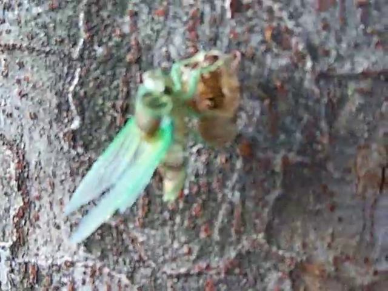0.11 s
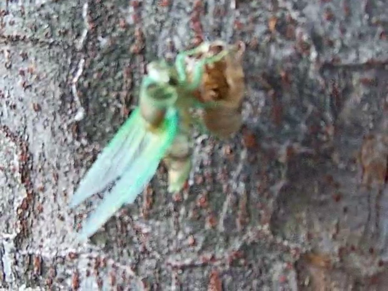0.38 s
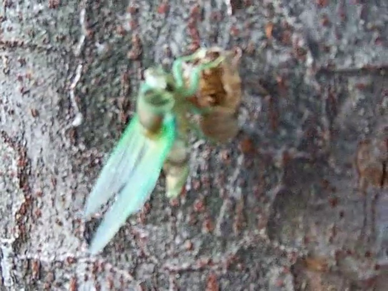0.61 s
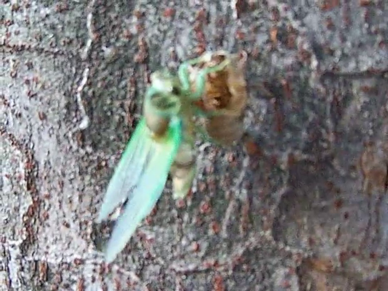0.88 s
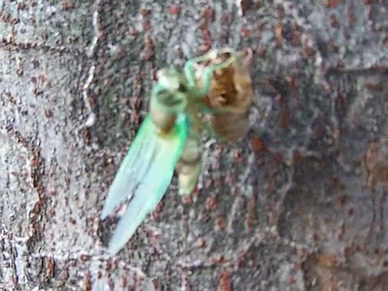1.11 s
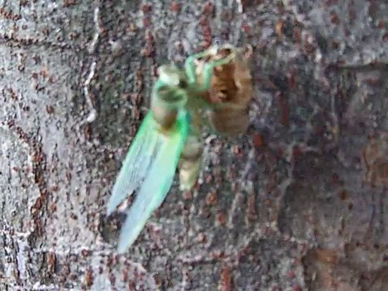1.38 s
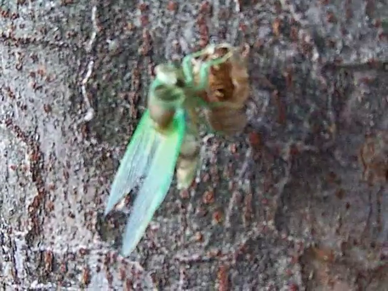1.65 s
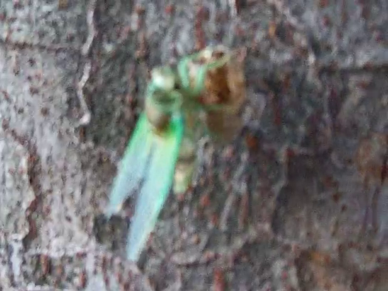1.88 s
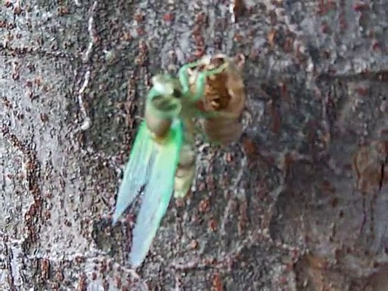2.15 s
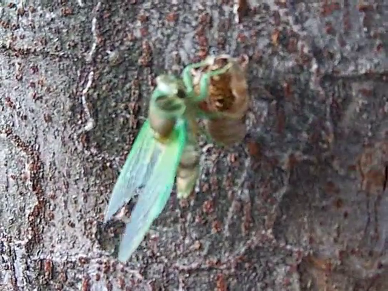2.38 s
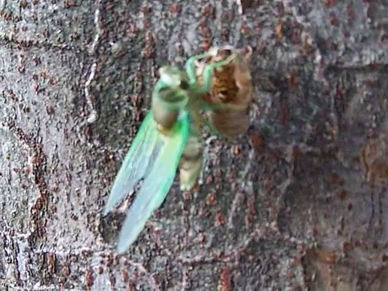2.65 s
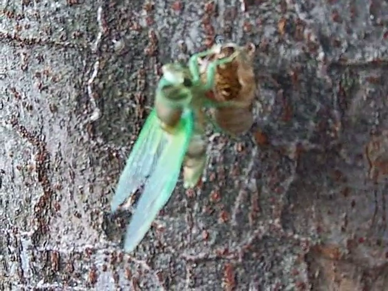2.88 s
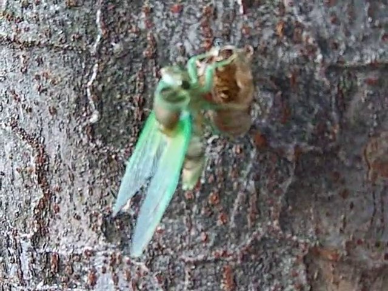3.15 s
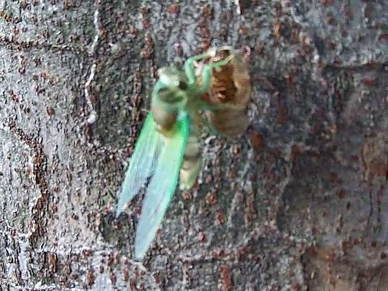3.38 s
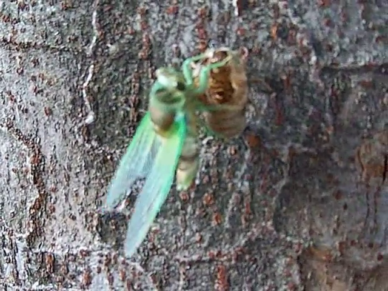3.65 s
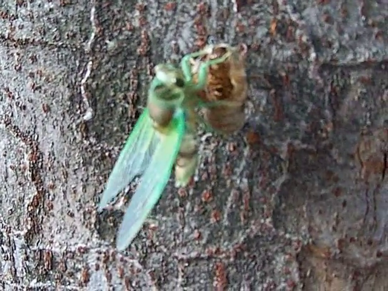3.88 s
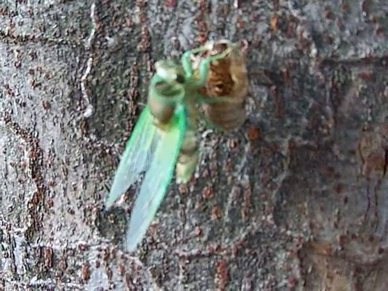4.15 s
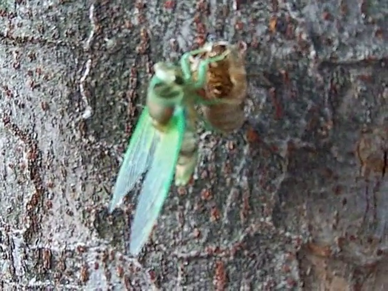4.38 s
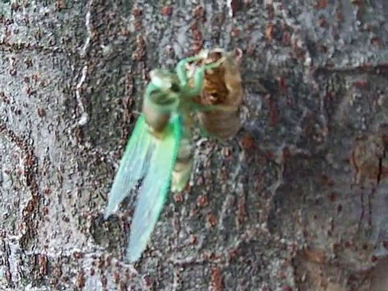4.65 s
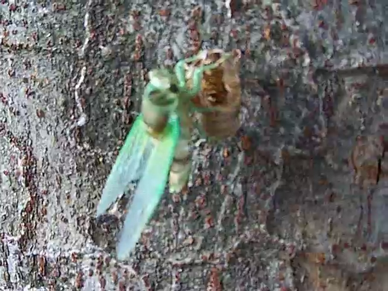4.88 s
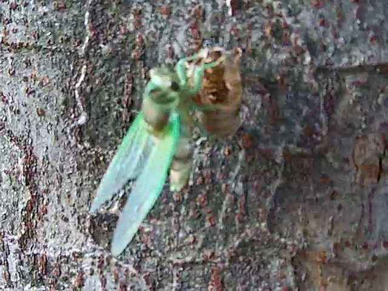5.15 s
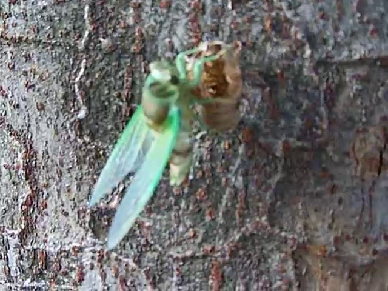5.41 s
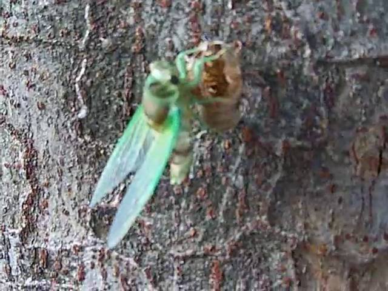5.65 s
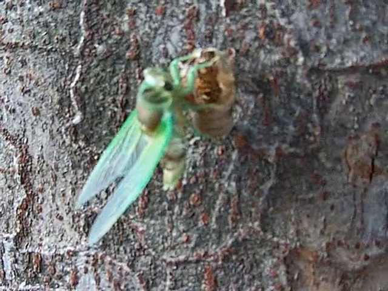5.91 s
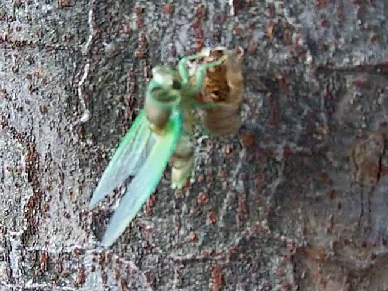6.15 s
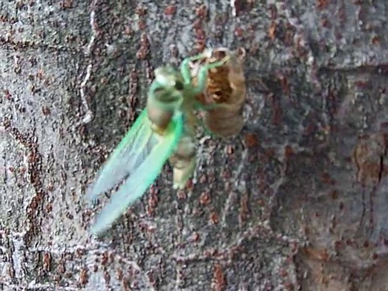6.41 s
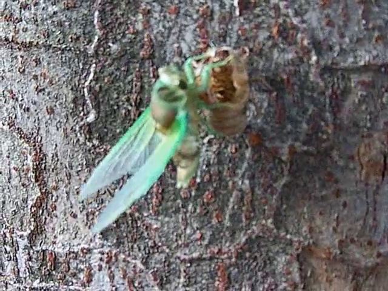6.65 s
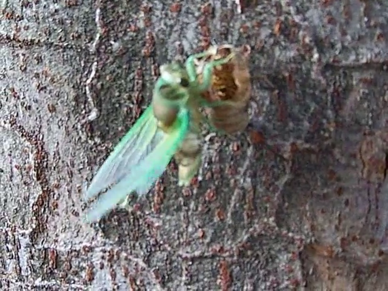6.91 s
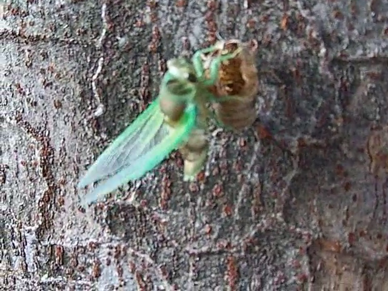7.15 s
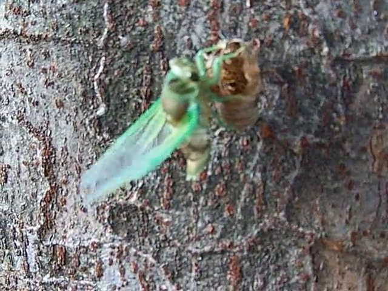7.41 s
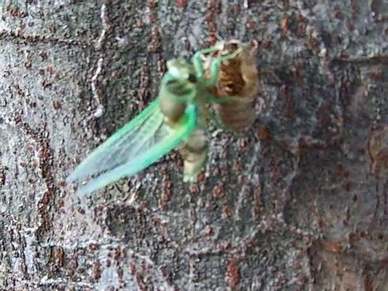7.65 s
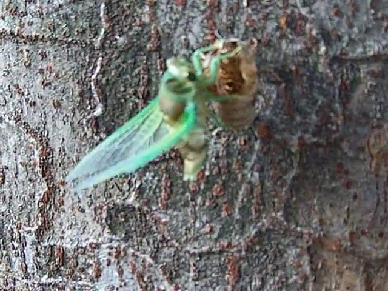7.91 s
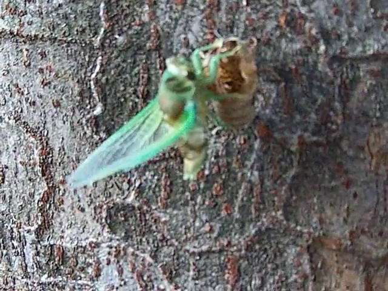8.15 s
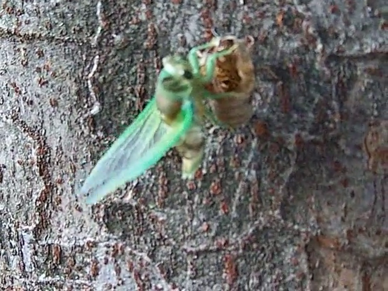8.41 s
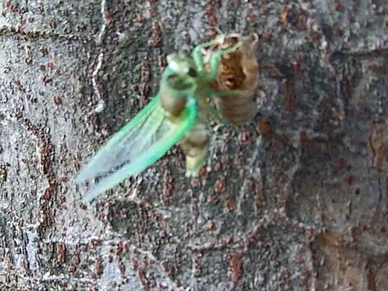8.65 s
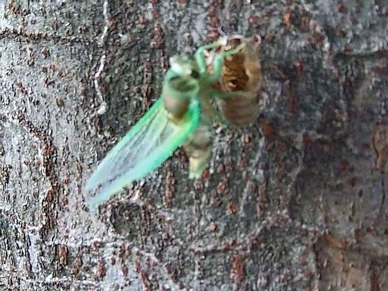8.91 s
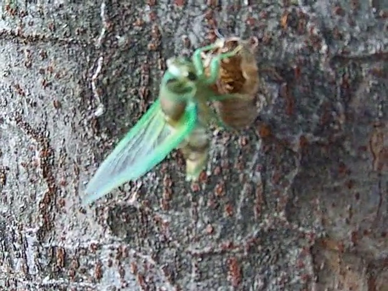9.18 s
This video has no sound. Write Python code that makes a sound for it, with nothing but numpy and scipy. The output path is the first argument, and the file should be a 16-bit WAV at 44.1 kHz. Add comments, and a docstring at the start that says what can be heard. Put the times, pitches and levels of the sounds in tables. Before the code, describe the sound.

A cicada close by buzzes in fast throbs, about six a second, over a steady cicada whine, a far insect chorus and low distant traffic.

```python
"""Cicadas buzz in trees: a near one throbs about six times a second, its clicks speeding up in each throb.
A steady singer and a far chorus fill in. The two singers are clicks that ring a small body; the chorus is noise.
Distant traffic roars and drones under them, made of coloured noise and wavering tones.
A small mono recorder samples at 16 kHz and drops a few samples between its blocks,
which leaves a faint regular ticking."""
import sys
import numpy as np
from scipy import signal
from scipy.io import wavfile
from scipy.ndimage import uniform_filter1d

SR = 44100
rng = np.random.default_rng(int(sys.argv[2]) if len(sys.argv) > 2 else 0)


def waveform_to_disk(signal):
    """Save audio, clipped to [-1, 1], as 16-bit WAV at the path in sys.argv[1]."""
    frames = np.transpose(np.atleast_2d(signal))
    scaled = np.clip(frames, -1, 1) * 32767
    samples = np.round(scaled).astype(np.int16)
    wavfile.write(sys.argv[1], SR, samples)


def decibels_to_gain(level_db):
    """Convert a level in decibels to a linear amplitude gain (20 dB per decade)."""
    exponent = np.asarray(level_db, float) / 20
    return 10 ** exponent


N = 409688


def evened(x):
    """Scales a sound to rms 1."""
    return x / np.sqrt(np.mean(x ** 2) + 1e-20)


def curve(rows):
    """Joins the rows of a table by straight lines: one value a sample for each column after the time."""
    time_s, *columns = np.transpose(rows)
    return [np.interp(np.arange(N) / SR, time_s, column) for column in columns]


def wander(per_s):
    """Slow random drift of rms 1: noise averaged twice over 1 / per_s seconds."""
    size = max(round(SR / per_s), 1)
    smooth = uniform_filter1d(rng.standard_normal(N), size)
    return evened(uniform_filter1d(smooth, size))


def hiss(spectrum, patchy_db):
    """Noise of a given colour, rms 1, with drifting louder and softer patches."""
    frames, hz = N // 256 + 5, np.fft.rfftfreq(1024, 1 / SR)
    real, imaginary, patches = rng.standard_normal((frames, 513, 3)).T
    # neighbouring pitches and moments share a patch
    patches = evened(uniform_filter1d(uniform_filter1d(patches, 12, 0), 14, 1))
    table_hz, table_db = np.transpose(spectrum)
    colour_db = np.interp(np.log(hz + 1), np.log(table_hz + 1), table_db)[:, None]
    cells = (real + 1j * imaginary) * decibels_to_gain(colour_db + patchy_db * patches)
    return evened(signal.istft(cells, nperseg=1024, noverlap=768)[1][:N])


def buckles(clicks_per_s, drift):
    """Places in samples at which the tymbals buckle: wherever the running count of clicks is whole."""
    count = np.cumsum(clicks_per_s * (1 + drift * wander(4))) / SR
    return np.interp(np.arange(1, int(count[-1])), count, np.arange(N))


def pulses(at, size):
    """Band-limited clicks, placed exactly even between two samples."""
    where = np.floor(at)[:, None] + np.arange(-8, 9)
    offset = where - at[:, None]
    shape = np.sinc(offset) * np.cos(np.pi * offset / 20) ** 2
    places = np.clip(where, 0, N - 1).astype(int)
    return np.bincount(places.ravel(), (size[:, None] * shape).ravel(), N)


def body(modes):
    """Ring of the body after a click: the powers of its modes add; so small a body sends out little low sound."""
    lowest_hz = 4840  # below this the ring fades steeply
    f = abs(np.fft.fftfreq(4096, 1 / SR))
    power = 0
    for hz, width, db in modes:
        peak = 1 / (1 + (2 * (f - hz) / width) ** 2)
        skirt = 1 / (1 + ((f - hz) / (1.56 * width)) ** 2)
        power = power + decibels_to_gain(2 * db) * peak * skirt
    low_cut = 1 + (lowest_hz / (f + 1)) ** 12
    log_gain = .5 * np.log(power / low_cut + 1e-12)
    # this phase makes the ring start at the click and never before it
    return np.fft.ifft(np.exp(np.conj(signal.hilbert(log_gain)))).real[:2048]


def cicada(level_db, modes, at, shake_s, uneven_db, weak_side_db, far_side_s, rib_db):
    """Two tymbals buckle in turn; each click rings the abdomen, and the trees throw it back."""
    # echoes off trunks and ground: (delay [s], level [dB])
    echoes = [(.0093, -15), (.016, -15), (.027, -17)]
    rib_gap_s, rib_shake_s = .00177, .00003  # the second rib: delay and its scatter
    shake, uneven, rib_shake = rng.standard_normal((len(at), 3)).T
    side = np.arange(len(at)) % 2
    # each click lands a little early or late, which blurs the lines of the buzz; the far side arrives later
    first = at + SR * (shake_s * shake + far_side_s * side)
    size = decibels_to_gain(uneven_db * uneven + weak_side_db * side)
    # a second rib of the tymbal gives way just after the first
    second = first + SR * (rib_gap_s + rib_shake_s * rib_shake)
    clicks = pulses(first, size) + pulses(second, size * decibels_to_gain(rib_db))
    ringing = evened(signal.oaconvolve(clicks, body(modes))[:N])
    direct = decibels_to_gain(level_db) * ringing
    thrown_back = sum(decibels_to_gain(db) * np.pad(direct, (round(s * SR), 0))[:N] for s, db in echoes)
    return direct + thrown_back


def throbbing():
    """Click rate and the levels of both rings: slow effort, one shape every throb, a little chance."""
    # one row every fourth throb: (time of the gap [s], low ring level [dB], high ring level [dB])
    throbs = [(-0.06, -27, -25), (0.627, -26.5, -28), (1.315, -28, -24.5), (2.011, -25.5, -24.5),
              (2.69, -25, -29), (3.381, -25.5, -26), (4.071, -25, -28), (4.762, -25.5, -26.5),
              (5.457, -25, -26.5), (6.158, -24.5, -28.5), (6.864, -25.5, -28), (7.58, -25, -29.5),
              (8.302, -27, -26), (9.045, -25.5, -30), (9.8, -24.5, -29.5)]
    # added within each throb: (share of its length [0-1], low ring [dB], high ring [dB])
    throb_shape = [(0, -12, -6), (.05, -7, -5), (.14, 0, -3.5), (.23, .5, -3), (.31, -2, -3),
                   (.6, -1.5, -1.5), (.72, .5, .5), (.8, .5, .5), (.87, -4, -1.5), (.95, -10, -5),
                   (1, -12, -6)]
    # the clicks speed up through most of each throb: (share of its length [0-1], rate [clicks per s])
    click_rate = [(0, 226), (.1, 238), (.2, 263), (.3, 278), (.5, 294), (.7, 330), (.8, 350), (.97, 360),
                  (1, 226)]
    gap_s = np.transpose(throbs)[0]
    throbs_done = np.interp(np.arange(N) / SR, gap_s, 4 * np.arange(len(gap_s)))  # 4 throbs a row
    share = throbs_done % 1
    low_effort_db, high_effort_db = curve(throbs)
    at, low_shape, high_shape = np.transpose(throb_shape)
    # no two throbs are alike
    low_db = low_effort_db + np.interp(share, at, low_shape) + 0.47 * wander(26)
    high_db = high_effort_db + np.interp(share, at, high_shape) + 1.5 * wander(26)
    return np.interp(share, *np.transpose(click_rate)), low_db, high_db


def near_cicada():
    """The throbbing singer: the same buckling tymbals give a low ring and a slightly later high ring."""
    # both tables: (pitch [Hz], width [Hz], level [dB])
    low_modes = [(5540, 200, -7.5), (5940, 170, -8), (6000, 170, 0.5), (6154, 140, 1.5), (6310, 200, -2),
                 (6860, 150, -8), (6950, 320, -3.5), (8025, 530, -0.5)]
    high_modes = [(6840, 280, -15), (7700, 260, -15.5), (7510, 400, -8.5), (7900, 270, -7.5),
                  (8240, 200, -1)]
    high_late_s = .0009  # the high ring lags each click
    clicks_per_s, low_db, high_db = throbbing()
    at = buckles(clicks_per_s, drift=.012)
    low = cicada(low_db, low_modes, at, shake_s=.000008, uneven_db=.7,
                 weak_side_db=-3.5, far_side_s=.0006, rib_db=-11)
    high = cicada(high_db, high_modes, at + SR * high_late_s, shake_s=.000012, uneven_db=.7,
                  weak_side_db=-2, far_side_s=.0001, rib_db=-3)
    return low + high


def steady_cicada():
    """A singer a few trees off buckles its tymbals at a nearly even rate, so it does not throb."""
    # ring of its body: (pitch [Hz], width [Hz], level [dB])
    steady_modes = [(5900, 180, -8.5), (5640, 730, -12), (6000, 430, -5.5), (6638, 110, 3),
                    (7380, 173, 2.5)]
    # its loudness: (time [s], level [dB])
    steady_level = [(0, -32.5), (1.5, -32), (3, -31), (4.5, -28.5), (6, -30), (7.5, -29), (9.3, -31)]
    at = buckles(331, drift=.015)  # clicks per s
    return cicada(curve(steady_level)[0], steady_modes, at, shake_s=.00003, uneven_db=0.7,
                  weak_side_db=0.5, far_side_s=0.000202, rib_db=-5.5)


def far_chorus():
    """Many far singers blend into one high noise with no single clicks."""
    # colour of the chorus: (pitch [Hz], relative level per Hz [dB])
    chorus = [(3600, -62.5), (4300, -45.5), (4600, -10), (5000, -10), (5390, 2.5), (6030, -8.5), (6500, 0),
              (7010, -10), (7600, 1), (8100, 16), (8500, -28.5)]
    return decibels_to_gain(-33) * hiss(chorus, patchy_db=1.5)


def town_wash():
    """The steady far wash of traffic, as low coloured noise."""
    # colour of the wash: (pitch [Hz], relative level per Hz [dB])
    town = [(15, -39), (25, -8.5), (44, -2), (128, -1.5), (324, -17.5), (385, -15), (439, -27.5),
            (632, -22), (994, -27), (1460, -30.5), (2620, -30.5), (3700, -37), (4300, -42.5), (5590, -75),
            (9460, -120)]
    return decibels_to_gain(-32) * hiss(town, patchy_db=1.7)


def passing_cars():
    """Three noises: the hiss follows the tyre roar but swells more steeply; the rumble surges on its own."""
    # levels over time: (time [s], tyre roar [dB], rumble [dB])
    cars = [(0.0, -44, -43), (0.75, -42.5, -42.5), (0.93, -36.5, -40.5), (1.3, -40, -37), (1.6, -39, -41),
            (3.05, -38.5, -42), (3.34, -38.5, -35.5), (3.55, -45.5, -42.5), (3.96, -42.5, -48),
            (4.2, -39.5, -38.5), (5.4, -41, -41.5), (6.6, -43.5, -47.5), (7.2, -44.5, -50.5),
            (8.8, -43.5, -44), (9.29, -45, -41)]
    # three colours of noise: (pitch [Hz], relative level per Hz [dB])
    roar_colour = [(60, -20.5), (200, 0), (500, -6.5), (1100, 0.5), (1500, -5), (2600, -14.5), (3500, -19),
                   (5000, -57.5)]
    rumble_colour = [(60, -12.5), (150, 2), (300, 3.5), (480, -1.5), (700, -6.5), (1200, -45)]
    hiss_colour = [(1500, -30.5), (2000, -9.5), (2600, -5.5), (3000, -13), (3500, -23)]
    roar_db, rumble_db = curve(cars)
    roar = decibels_to_gain(roar_db) * hiss(roar_colour, patchy_db=1.0)
    rumble = decibels_to_gain(rumble_db) * hiss(rumble_colour, patchy_db=-1.0)
    # the hiss is at -49.5 dB when the roar is at -40 dB, and gains 1.6 dB per dB of roar
    hiss_db = -49.5 + 1.6 * (roar_db + 40)
    return roar + rumble + decibels_to_gain(hiss_db) * hiss(hiss_colour, patchy_db=2.5)


def resonate(x, hz, width):
    """Keeps the sound close to one pitch: shifts hz down to zero, smooths, and shifts back."""
    turn = np.exp(2j * np.pi * np.cumsum(hz * np.ones(N)) / SR)
    r = np.exp(-np.pi * width / SR)
    return 2 * (turn * signal.lfilter([1 - r], [1, -r], x / turn)).real


def wavering_tone(hz, level_db, width, clean):
    """A tone that is part steady, part blurred by the way through the air; clean is the steady share of power."""
    steady = np.sqrt(2) * np.sin(2 * np.pi * np.cumsum(hz * np.ones(N)) / SR)
    narrow_noise = resonate(rng.standard_normal(N), hz, width)
    blurred = evened(resonate(narrow_noise, hz, width))
    return decibels_to_gain(level_db) * (np.sqrt(clean) * steady + np.sqrt(1 - clean) * blurred)


def low_traffic_tone():
    """A low tone near 50 Hz, partly blurred, glides and swells strongly; before 2.2 s it stands for low noise."""
    # (time [s], pitch [Hz], level [dB])
    low_tone = [(0.0, 56.4, -48), (0.7, 41.6, -35), (1.25, 48.3, -46), (1.7, 44, -43), (2.1, 49, -41),
                (2.45, 49.5, -28), (2.66, 53.5, -26.5), (3.0, 52, -31.5), (3.26, 51.52, -25),
                (3.52, 49.95, -44), (3.85, 43.45, -37), (3.98, 48.52, -28.5), (4.27, 53, -28),
                (4.81, 52.1, -32.5), (5.0, 53, -35.5), (5.6, 52.7, -35.5), (6.05, 52.9, -30),
                (6.5, 53.68, -32.5), (7.3, 55.5, -38), (7.92, 57.2, -30.5), (8.72, 56.3, -35.5),
                (8.95, 55.4, -44), (9.1, 50.7, -30), (9.29, 48.7, -26)]
    hz, level_db = curve(low_tone)
    return wavering_tone(hz, level_db + 0.5 * wander(16), width=12, clean=0.79)


def traffic_drone():
    """A higher drone of the traffic: a gliding tone and its octave."""
    # (time [s], pitch [Hz], level [dB], level of the octave [dB])
    drone = [(0, 177, -92, -93), (3.6, 177.3, -65, -60.5), (4.1, 176.3, -50, -46), (4.5, 173, -39.5, -52),
             (4.7, 169.8, -39.5, -45), (5.7, 168.1, -41, -51.5), (6.2, 168.6, -45, -52),
             (6.8, 178.6, -41.5, -72), (7.4, 180.6, -51, -74), (8.3, 174.8, -40.5, -73),
             (9, 201, -41.5, -81), (9.3, 199.5, -41, -79)]
    hz, level_db, octave_db = curve(drone)
    low = wavering_tone(hz, level_db, width=9.3, clean=1.0)
    return low + wavering_tone(2 * hz, octave_db, width=3.3, clean=0.32)


def machinery_hums():
    """Steady machinery gives tones of fixed pitch, each partly blurred."""
    # (pitch [Hz], level [dB], width of the blurring resonance [Hz], steady share of power [0-1])
    hums = [(121.9, -37.5, 8.8, 0.4), (140.9, -40.5, 2.7, 0.55), (239, -48, 11, 0.75),
            (383.8, -45.5, 20, 0.82)]
    return sum(wavering_tone(*hum) for hum in hums)


def scene():
    """One microphone hears everything: both channels are alike."""
    insects = near_cicada() + steady_cicada() + far_chorus()
    traffic = town_wash() + passing_cars() + low_traffic_tone() + traffic_drone() + machinery_hums()
    return np.tile(insects + traffic, (2, 1))


def roll_off(x):
    """The treble ends steeply here."""
    return signal.sosfilt(signal.butter(12, 9130, fs=SR, output="sos"), x)


def record(dry):
    """Takes 259 samples in the time of a 256-sample block, drops about 3 at each join, rises to the full rate."""
    block_size, first_join = 256, 116  # samples at 16 kHz
    steep = signal.firwin(504 * 80 + 1, 1 / 504, window=("kaiser", 8))
    low_rate = signal.resample_poly(dry[0], 185, 504, window=steep)
    n = np.arange(N * 160 // 441)
    block = (n + block_size - first_join) // block_size
    dropped = np.cumsum(rng.choice([2, 3, 3, 3, 3, 4], block[-1] + 1))
    joined = low_rate[np.minimum(n + dropped[block], len(low_rate) - 1)]
    # the short filter lets a mirror of the top band through above 8 kHz
    full = signal.resample_poly(joined, 441, 160, window=("kaiser", 5.0))[:N]
    edge = signal.firwin(121, 8760, window=("kaiser", 7), fs=SR)  # top of the band [Hz]
    full = np.convolve(np.pad(full, (0, N - len(full))), edge, "same")
    return roll_off(np.tile(full, (2, 1)))


dry = scene()
out = record(dry)
waveform_to_disk(out)
```